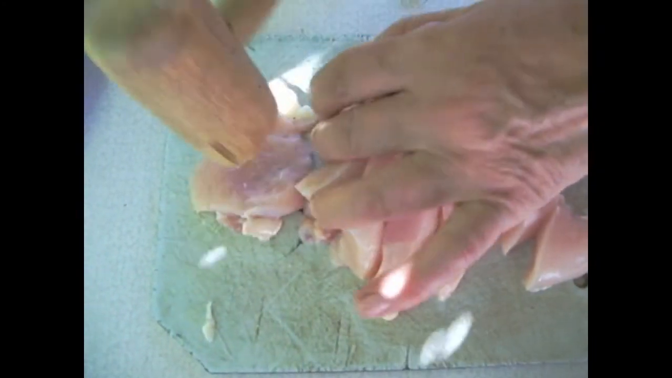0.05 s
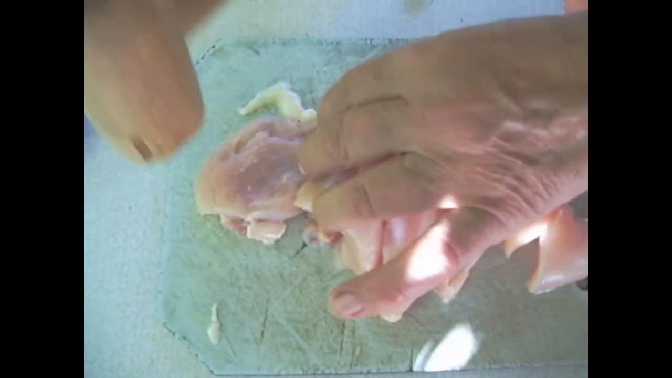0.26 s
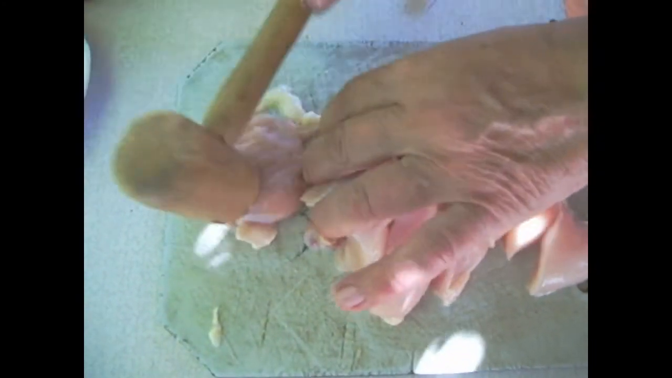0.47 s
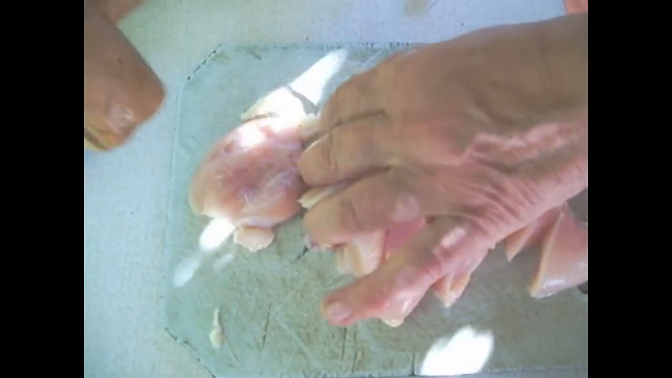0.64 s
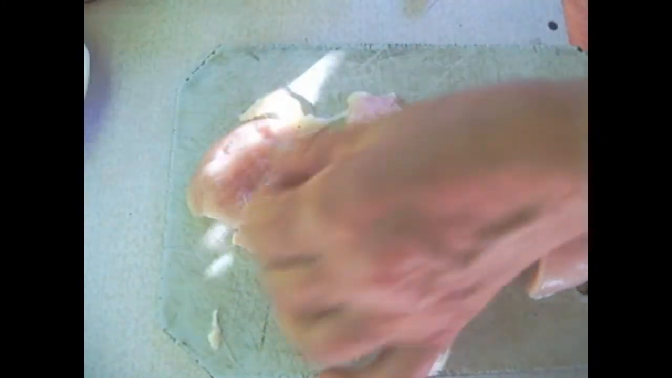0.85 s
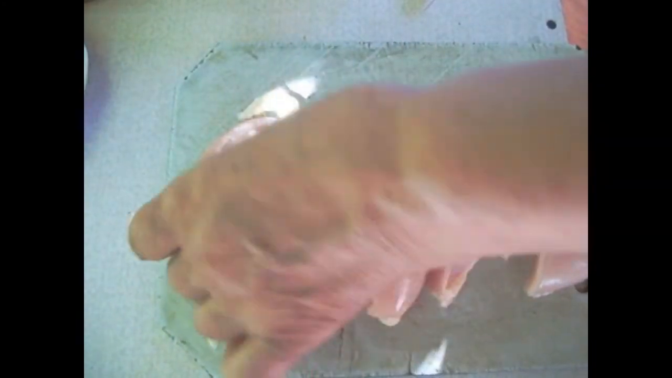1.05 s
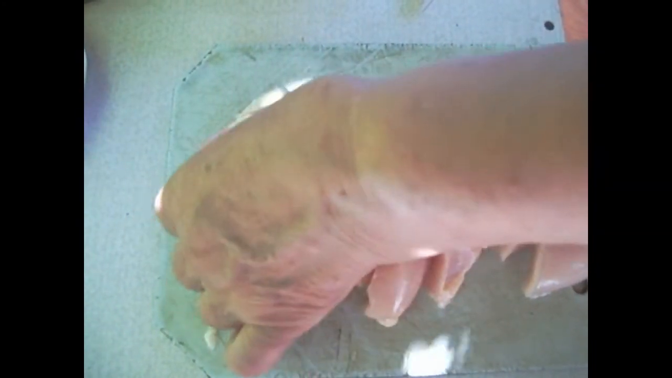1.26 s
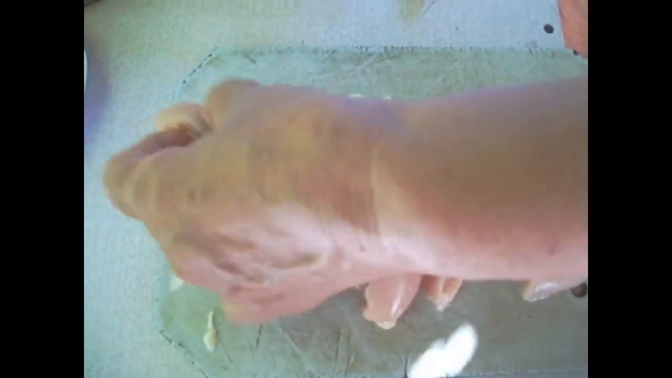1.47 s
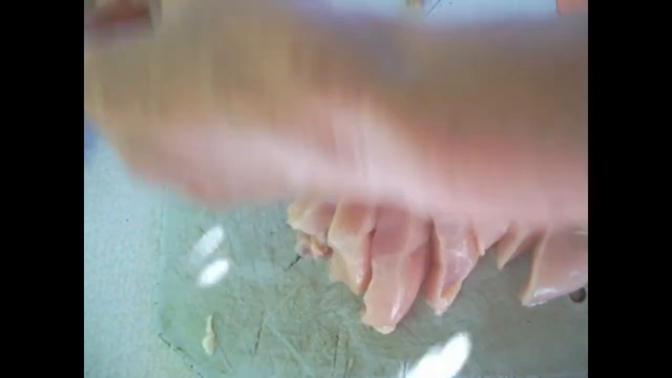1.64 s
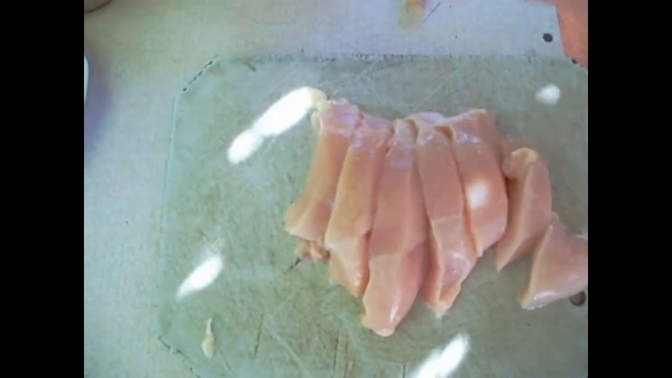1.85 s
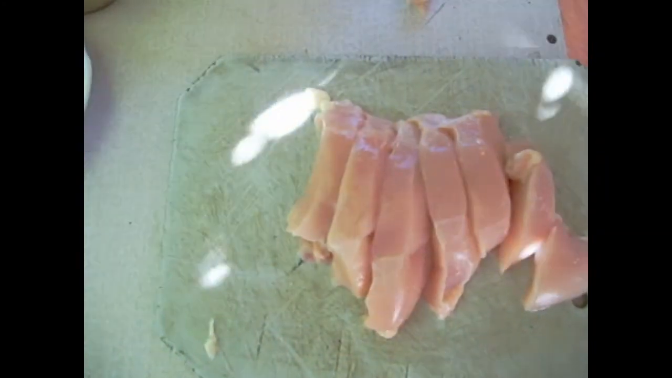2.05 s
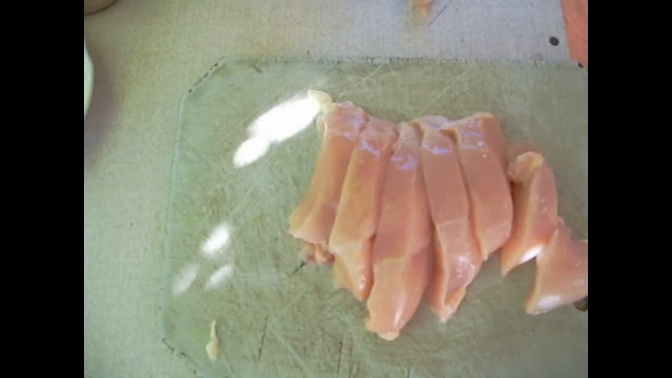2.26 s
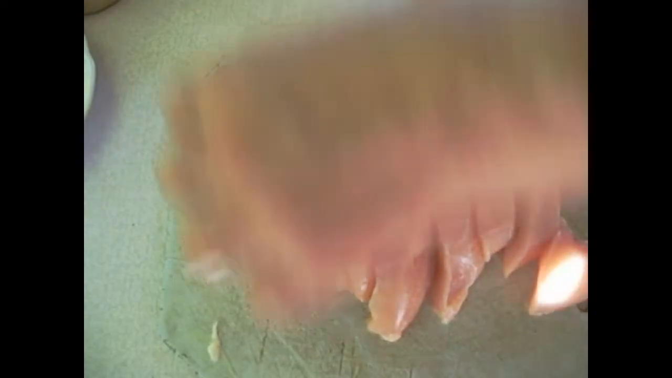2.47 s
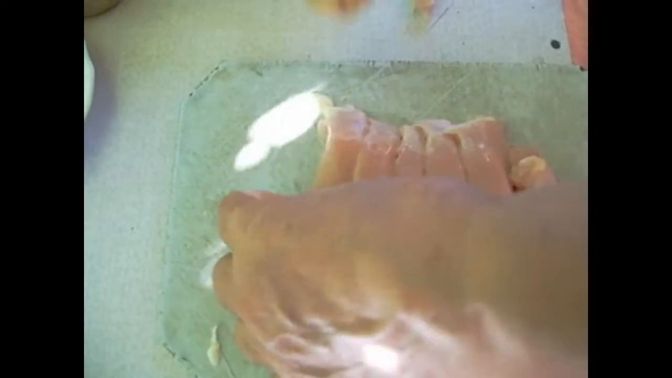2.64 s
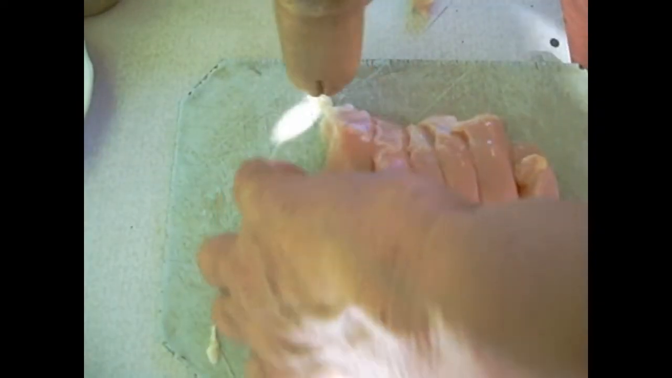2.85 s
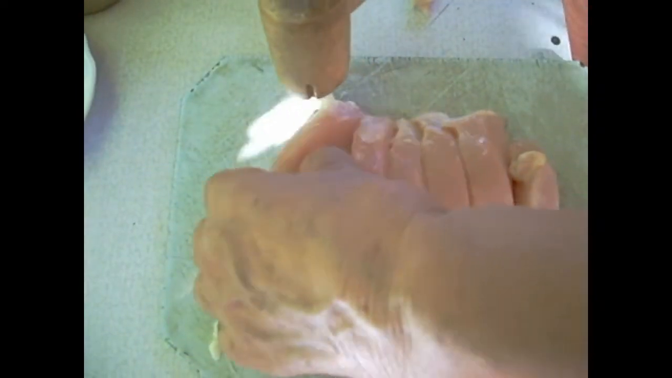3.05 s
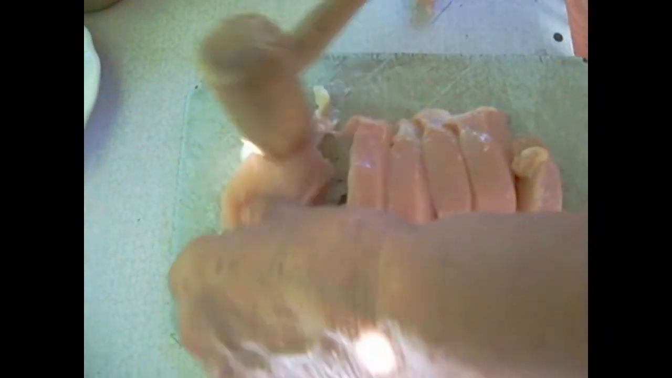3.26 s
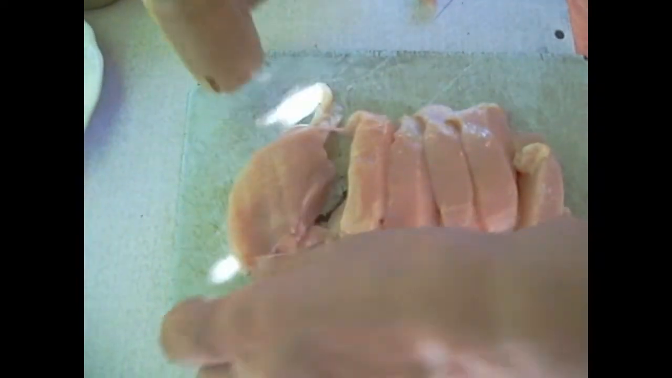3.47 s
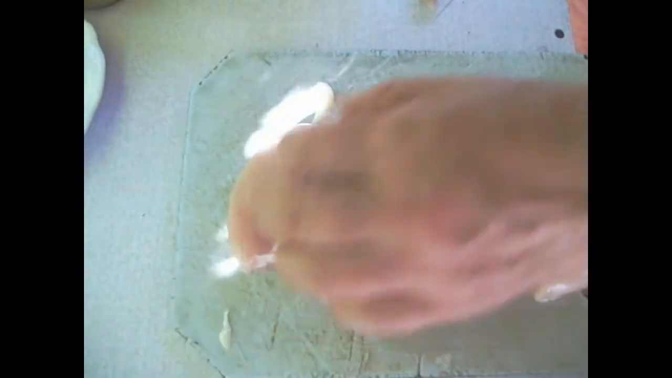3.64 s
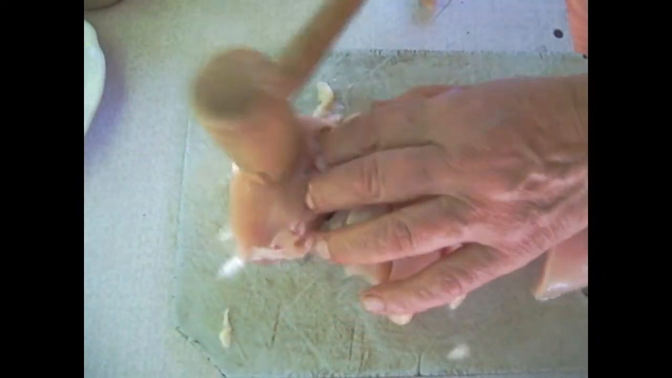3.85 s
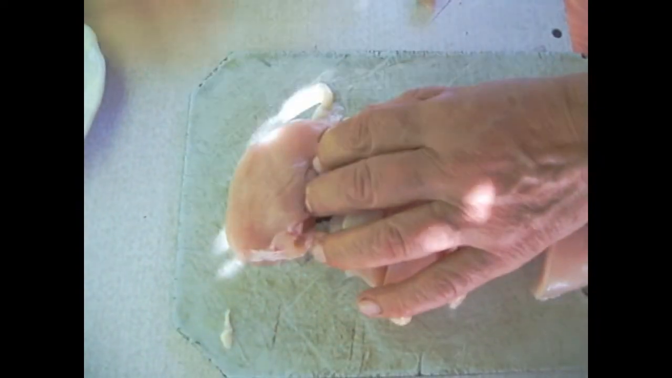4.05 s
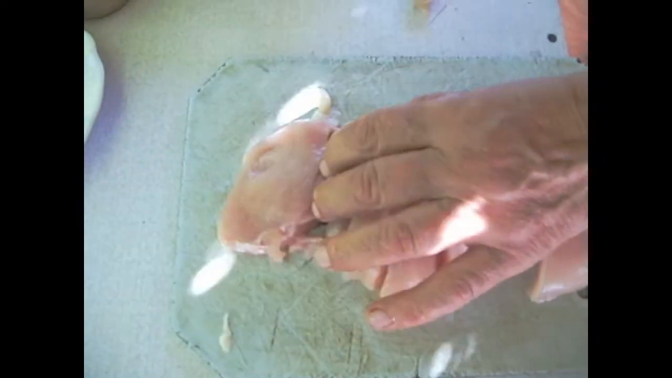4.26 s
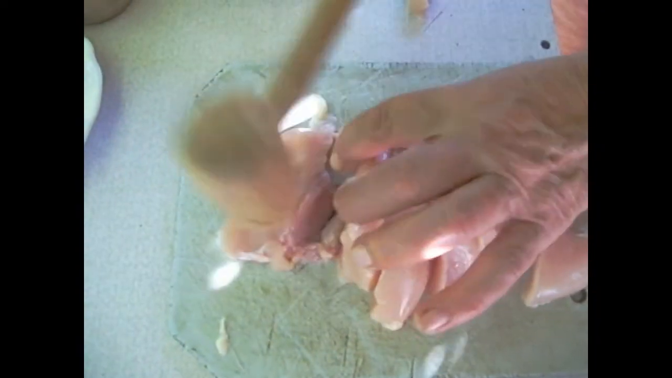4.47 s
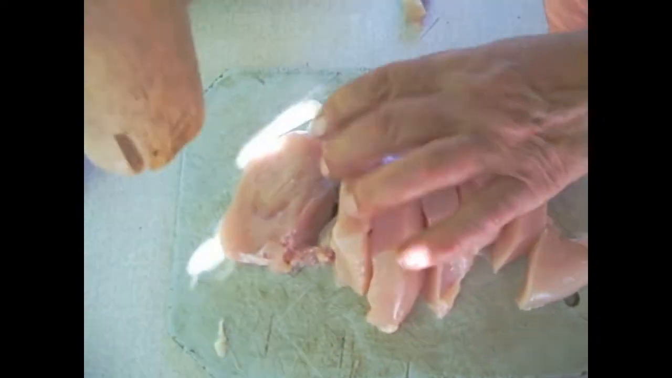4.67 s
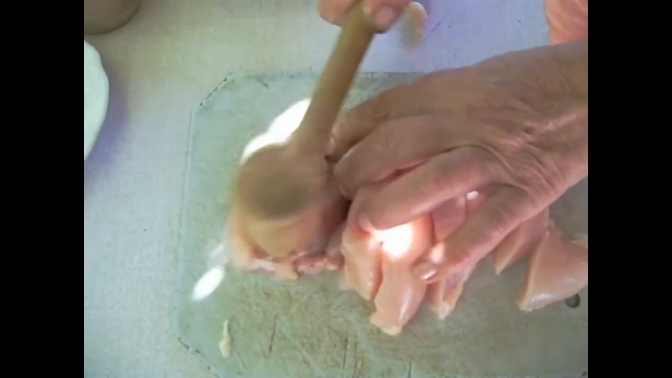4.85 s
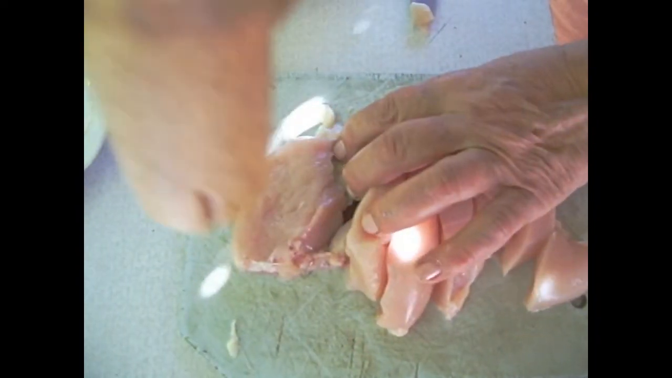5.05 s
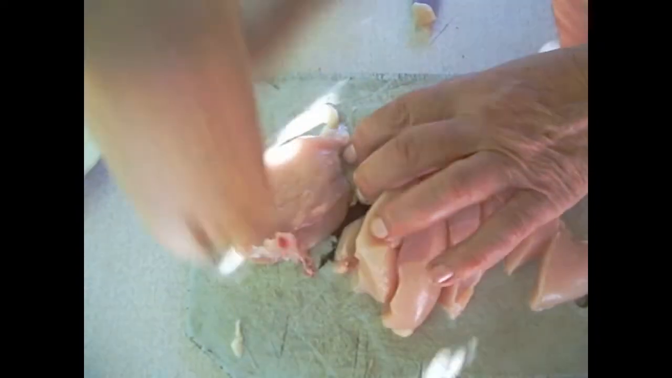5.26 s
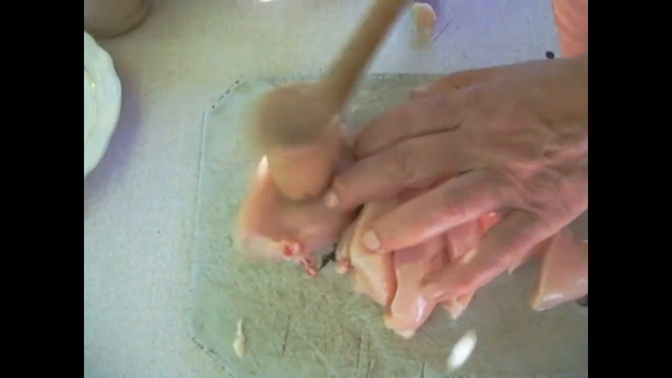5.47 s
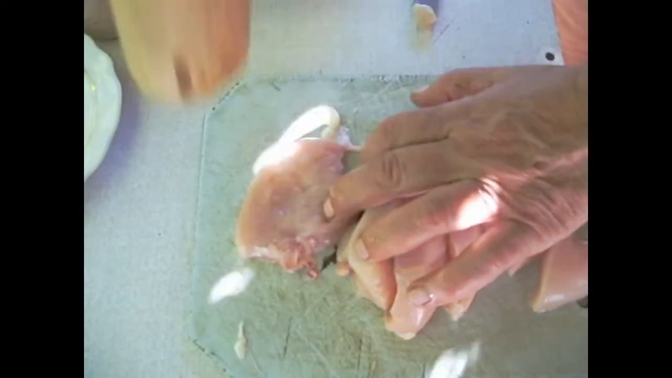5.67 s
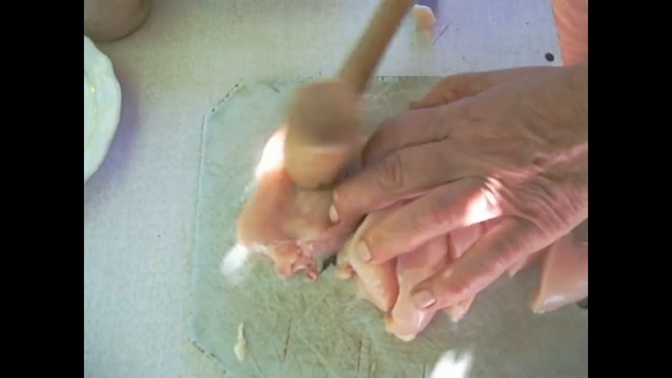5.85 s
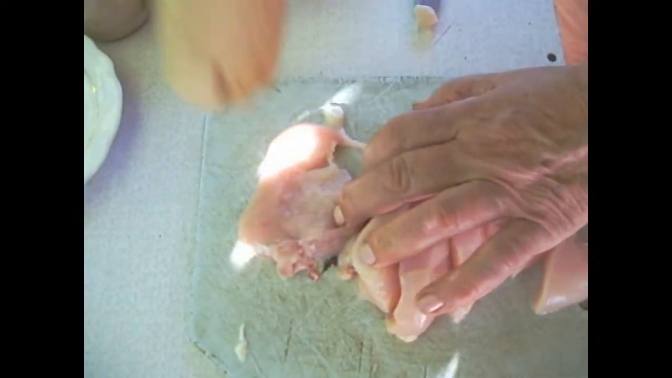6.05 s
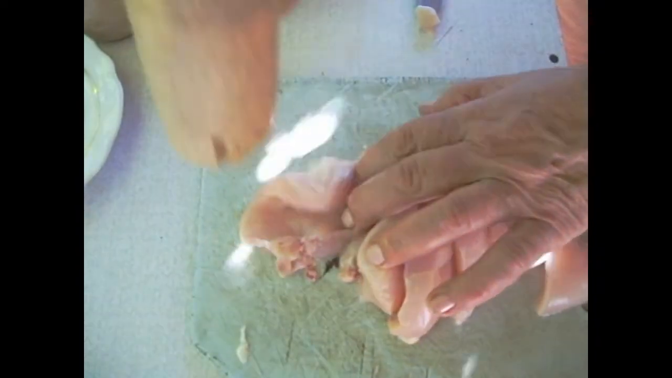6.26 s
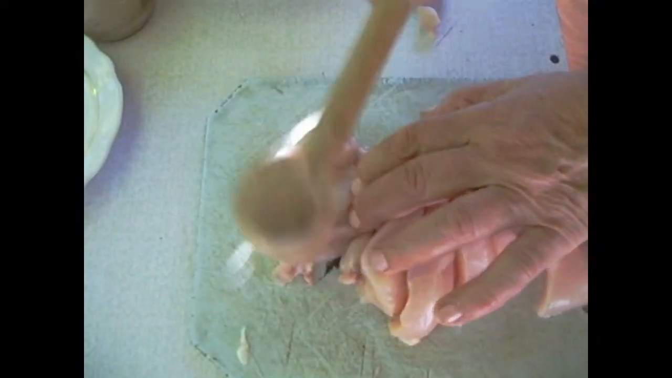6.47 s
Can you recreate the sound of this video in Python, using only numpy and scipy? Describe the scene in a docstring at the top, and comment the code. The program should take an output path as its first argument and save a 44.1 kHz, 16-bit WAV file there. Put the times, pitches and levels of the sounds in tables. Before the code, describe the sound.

Close in a small kitchen, a wooden mallet smacks raw meat on a cutting board once, rattling nearby dishes. A hissy pause follows, with faint finger taps, a sticky peel and soft bumps. After a lighter knock, loud wet blows come about three per second until the end, distorting a cheap microphone.

```python
"""Soft bumps over low rumble, hiss and thin whines come first; then a wooden mallet pounds raw meat on a board.
Each blow slaps wet meat (bright noise), knocks the board and shakes the worktop (ringing modes, rough thump),
and makes crockery chatter (noise and clinks). Between blows fingers tick, bump and peel the sticky meat.
It is a small kitchen, close to a cheap camera microphone: a faint noise tail, and an input that overloads."""
import sys
import numpy as np
from scipy import signal
from scipy.fft import rfft, irfft
from scipy.io import wavfile

SR = 44100
rng = np.random.default_rng(int(sys.argv[2]) if len(sys.argv) > 2 else 0)


def transcribe(u):
    """Save the signal u as a 16-bit wav file named by the first command-line argument.

    u: samples, shape (n,) or (channels, n), limited to [-1, 1]; the rate is SR.
    q: integer samples, one column per channel.
    """
    v = np.clip(np.atleast_2d(u).T, -1, 1)
    q = np.round(v * 32767).astype(np.int16)
    wavfile.write(sys.argv[1], SR, q)


N = 287085
T = np.arange(N) / SR


def from_db(db):
    """Decibels to gain."""
    return 10 ** (np.asarray(db) / 20)


def at_hz(points, hz):
    """Read a table of (Hz, value) on a log-frequency axis."""
    points = np.array(points)
    return np.interp(np.log(hz), np.log(points[:, 0]), points[:, 1])


def coloured(spectrum):
    """Steady noise shaped by a spectrum of (Hz, dB per Hz), rms 1."""
    hz = np.maximum(np.fft.rfftfreq(N, 1 / SR), 1)
    noise = irfft(rfft(rng.standard_normal(N)) * from_db(at_hz(spectrum, hz)), N)
    return noise / noise.std()


def stepped_gain(spread_db, step):
    """Random gain that holds each value for a number of samples."""
    values = rng.standard_normal(N // step + 1)
    return from_db(spread_db * np.repeat(values, step)[:N])


def burst(start_s, db, rise_s, t60_s):
    """Envelope that rises from start_s and dies away exponentially."""
    envelope, start = np.zeros(N), int(start_s * SR) + 1
    age = T[start:start + int(2 * t60_s * SR) + 2] - start_s
    rise = 1 - np.exp(-age / max(rise_s, 1e-5))
    envelope[start:start + len(age)] = from_db(db - 60 * age / max(t60_s, 1e-4)) * rise
    return envelope


def push(start_s, db, rise_s, t60_s):
    """Burst scaled by its energy: as a noise force, db sets the height of the ringing it starts."""
    shape = burst(start_s, 0, rise_s, t60_s)
    return from_db(db) * shape / np.sqrt(np.sum(shape ** 2))


def ring(force, hz, t60_s):
    """Resonant mode: a unit click sets a decaying sine of height 1 ringing."""
    radius, angle = from_db(-60 / (t60_s * SR)), 2 * np.pi * hz / SR
    feedback = [1, -2 * radius * np.cos(angle), radius * radius]
    return signal.lfilter([0, np.sin(angle)], feedback, force + 1e-18)   # tiny inaudible offset


# Mallet blows: start_s [s], slap_db [dB], board_db [dB], board_pitch_hz [Hz], push_t60_s [s],
# worktop_db [dB], rattle_db [dB], clink_db [dB]
BLOWS = [(0.3954, 3.5, 7, 1250, 0.12, -10, -5, -26.5), (3.3742, -16, 5, 970, 0.012, -20.5, -45, -62),
         (3.8303, -5.5, 9, 1134, 0.08, -14.5, -11, -30.5), (4.119, 8, 18.5, 1187, 0.044, -3, -5, -19.5),
         (4.411, 10.5, 16, 1200, 0.051, -6, -5.5, -25.5), (4.8418, 9, 11, 1196, 0.046, -8.5, -7, -27.5),
         (5.1561, 8, 12.5, 1240, 0.11, -6.5, -3.5, -19.5), (5.5041, 7, 10, 1106, 0.086, -13.5, -7, -27),
         (5.8230, 4.5, 11.5, 1224, 0.035, -9.5, -11.5, -26.5),
         (6.1279, 9.5, 8.5, 1234, 0.14, -6, -10.5, -20), (6.4255, 3, 5.5, 1090, 0.061, -20, -30, -49)]
# Further contacts just before or after a blow: start_s [s], slap_db [dB], board_db [dB]
OTHER_CONTACTS = [(0.3919, -14, -15.5), (3.833, 5.5, -17), (3.8750, 0.5, -23), (4.1411, -12, 3.5),
                  (4.891, -9.5, -19), (5.2240, -9.5, -15), (5.5080, -3, -18), (6.43, 5, -1),
                  (6.4536, -0.5, -10)]
# Light touches on the board: start_s [s], board_db [dB], treble_db [dB], board_pitch_hz [Hz]
TAPS = [(.518, -42, -30, 1200), (1.128, -34.5, -41, 1020), (1.15, -32.5, -39, 1030),
        (1.364, -35, -34.5, 1180), (1.8221, -30.5, -36, 1290), (2.29, -27, -51, 740),
        (3.054, -33, -53, 804), (3.138, -24, -30, 1100), (3.197, -35, -38, 1050), (3.2473, -21, -32, 1096),
        (4.33, -32, -54, 1030)]
# Spectrum of the wet slap: pitch_hz [Hz], density_db [dB per Hz]
SLAP = [(500, 17.5), (1500, 10), (3000, 16), (5000, 14.5), (7000, 2), (12000, 4), (16000, -20)]


def slaps():
    """Wet meat and wood meet in a short bright splash of noise; light touches are duller."""
    rise_s = 0.0003
    blows = sum(burst(blow[0], blow[1], rise_s, 0.092) for blow in BLOWS)
    other_contacts = sum(burst(start_s, slap_db, rise_s, 0.049) for start_s, slap_db, _ in OTHER_CONTACTS)
    taps = sum(burst(start_s, treble_db, rise_s, 0.059) for start_s, _, treble_db, _ in TAPS)
    bright = (blows + other_contacts) * coloured(SLAP)
    dull = taps * coloured([(1000, -32), (2500, 5.5), (4500, -0.5), (7000, -8), (16000, -16)])
    return bright + dull


# Modes of the cutting board: pitch_hz [Hz], level_db [dB], t60_s [s]
BOARD = [(824, -2.5, 0.062), (895, -2.5, 0.049), (951, 0.5, 0.044), (1008, -1.5, 0.034),
         (1067, -3.5, 0.044), (1119.5, 0.5, 0.049), (1178.4, -1.5, 0.038), (1257, 0, 0.043),
         (1309.6, -2, .05), (1389, -2.5, 0.049), (1545, -0.5, 0.042), (1735, -6, 0.05), (2046, -8, 0.046)]


def board():
    """The meat cushions the mallet, so a push lasts some milliseconds; the spot struck favours modes near one pitch."""
    pushes = [(push(blow[0], blow[2], 0.0011, blow[4]), blow[3]) for blow in BLOWS]
    pushes += [(push(start_s, board_db, 0.0003, 0.0081), 1150) for start_s, _, board_db in OTHER_CONTACTS]
    pushes += [(push(start_s, board_db, 0.00058, 0.03), hz) for start_s, board_db, _, hz in TAPS]
    forces = np.array([force for force, _ in pushes])
    favoured_hz = np.array([hz for _, hz in pushes])
    out = np.zeros(N)
    for hz, level_db, t60_s in BOARD:
        octaves_off = abs(np.log2(hz / favoured_hz))
        share = from_db(level_db - np.minimum(29.2 * octaves_off, 12))   # at most 12 dB weaker
        out += ring(share @ forces * rng.standard_normal(N), hz, t60_s)
    return out


# Modes of the worktop: pitch_hz [Hz], level_db [dB], t60_s [s]
WORKTOP = [(135.3, -12, 0.32), (152, -8.5, 0.13), (189.4, -7, 0.26), (246, -17, 0.11), (289, -2.5, 0.19),
           (318.5, -5, 0.16), (392.6, -5.5, 0.19), (438, -6.5, 0.1), (580, -12, 0.098), (630, -8, 0.048),
           (693, -2, 0.15), (798.4, -2.5, .15)]
THUMP_DB = 1.8   # rough thump against the worktop modes


def worktop():
    """Each blow strikes the worktop modes with its own strengths and signs, over a dull rough thump."""
    blows = np.array(BLOWS)
    at, blow_db = (blows[:, 0] * SR).astype(int), blows[:, 5]
    shape = (len(BLOWS), len(WORKTOP))
    spread_db = 2.5 * rng.standard_normal(shape)
    signs = rng.choice([-1, 1], shape)
    modes = np.zeros(N)
    for k, (hz, level_db, t60_s) in enumerate(WORKTOP):
        strikes = np.zeros(N)
        strikes[at] = signs[:, k] * from_db(blow_db + level_db + spread_db[:, k])
        modes += ring(strikes, hz, t60_s)
    thump = from_db(THUMP_DB) * coloured([(30, -34), (110, -19), (200, -1), (450, 0), (900, -2),
                                          (1500, -9), (2500, -22), (4000, -37)])
    return modes + thump * sum(burst(blow[0], blow[5], 0.0054, 0.17) for blow in BLOWS)


# Dishes start to hop soon after a blow, and hop longer the harder the worktop shakes
HOP_DELAY_S, HOP_LENGTH_S, HOP_S_PER_DB = 0.011, 0.091, 0.004   # length is at worktop_db = 0


def hopping(settle_s):
    """For each blow, how hard the dishes hop: it builds up, wanes and then settles."""
    hops = []
    for blow in BLOWS:
        start_s = blow[0] + HOP_DELAY_S
        end_s = start_s + HOP_LENGTH_S + HOP_S_PER_DB * blow[5]
        settling = 1 + np.exp(np.clip((T - end_s) / settle_s, -50, 50))
        hops.append(burst(start_s, 0, 0.0062, 0.29) / settling)
    return np.array(hops)


# Modes of the dishes: pitch_hz [Hz], level_db [dB], t60_s [s]
CROCKERY = [(2520, -9, .14), (2713, -14, .1), (3555, -9, .07), (3980, -7, .1), (4178, -4, .09),
            (5656, -4, .08), (6203, -6, .11), (7133, -8, .07), (7710, 2, .065), (7827, -7, .06),
            (8985, -7, .075), (9568, -7, .075), (9946, -6, .09), (11050, -16, .07), (11890, -9, .06),
            (12090, -11, .06), (12335, -8, .075), (12630, -14, .07), (13740, -14, .06), (14630, -11, .06),
            (14920, -11, .06), (15470, -12, .065)]


def crockery():
    """Dishes hop on the shaking worktop: a rattle of noise and uneven clinks; each blow favours other modes."""
    rattle_db, clink_db = np.array(BLOWS)[:, 6:].T
    clinks = rng.random(N) < 1500 / SR   # 1500 contacts per second on average
    clinks = clinks * from_db(4.2 * np.minimum(rng.exponential(1, N), 3))
    favour_db = 1.5 * rng.standard_normal((len(BLOWS), len(CROCKERY)))
    hops = hopping(settle_s=0.0017)
    rings = np.zeros(N)
    for k, (hz, level_db, t60_s) in enumerate(CROCKERY):
        strength = from_db(level_db + clink_db + favour_db[:, k]) @ hops
        rings += ring(strength * clinks * rng.standard_normal(N), hz, t60_s)
    rattle = coloured([(800, -13), (2500, 13), (5000, 11.0), (9000, 2.5), (16000, -7)])
    rattle *= stepped_gain(3, 88)   # contacts come in uneven 2 ms spurts
    return rings + from_db(rattle_db) @ hopping(settle_s=0.0095) * rattle


# Sticky meat lets go with a tick: start_s [s], peak_db [dB], pitch_hz [Hz]
TICKS = [(.5535, -33, 8800), (2.240, -27, 4270), (2.247, -25, 9500), (2.2463, -24.5, 2600),
         (2.250, -18, 4230), (2.258, -26, 2160), (2.266, -23, 3400), (2.268, -25, 4350),
         (2.759, -28, 10800), (3.145, -25, 2740), (3.2474, -24, 2710), (3.691, -33, 3330),
         (5.589, -19, 13500), (5.946, -31, 12000), (5.967, -28, 9800), (6.4955, -25, 13600)]
FAINT_TICKS_PER_S, FAINT_TICK_DB = 2.5, -33   # scattered at random
FAINT_TICK_LOW_HZ, FAINT_TICK_HIGH_HZ = 9000, 14000


def ticks():
    """Sticky meat letting go: short noise bursts ring a briefly sounding resonance."""
    out = np.zeros(N)
    span_hz = FAINT_TICK_HIGH_HZ - FAINT_TICK_LOW_HZ
    draws = rng.random((int(FAINT_TICKS_PER_S * T[-1]), 2))
    faint = [(T[-1] * when, FAINT_TICK_DB, FAINT_TICK_LOW_HZ + span_hz * pitch) for when, pitch in draws]
    length = SR // 20
    for start_s, peak_db, hz in TICKS + faint:
        start = int(start_s * SR)
        near = slice(start, start + length)
        force = burst(start_s, 0, 0.00019, 0.026)[near] * rng.standard_normal(length)[:N - start]
        tick = ring(force, hz, 24 / hz)
        out[near] += from_db(peak_db) * tick / abs(tick).max()
    return out


# Soft bumps through the worktop: start_s [s], level_db [dB], pitch_hz [Hz]
BUMPS = [(0.055, -22.5, 150), (0.084, -21, 198), (.11, -22, 120), (2.283, -20, 450), (2.296, -10, 353),
         (2.307, -18, 450), (2.431, -20.5, 80), (2.956, -14, 141), (3.255, -12.5, 335), (5.784, -16, 132)]


def bumps():
    """Soft knocks: low sines that die within a few cycles."""
    out = np.zeros(N)
    for start_s, level_db, hz in BUMPS:
        out -= burst(start_s, level_db, 0.0016, 2.8 / hz) * np.sin(2 * np.pi * hz * (T - start_s))
    return out


PEEL_S, PEEL_DB, PEEL_RISE_S, PEEL_T60_S = 2.238, -31.5, 0.007, 0.32


def peel():
    """A strip is pulled off the board: a burst of noise whose level jumps as it lets go in jerks."""
    grains = stepped_gain(2.5, 64)
    crackle = coloured([(200, -10), (400, -7), (1200, -12), (2500, -11), (4300, -16), (5500, -20), (15000, -20)])
    return burst(PEEL_S, PEEL_DB, PEEL_RISE_S, PEEL_T60_S) * grains * crackle


# Level of the low rumble: time_s [s], level_db [dB rms]
RUMBLE = [(0.0, -42), (0.3, -46), (0.55, -42), (0.9, -48), (1.34, -44.5), (1.9, -50.5), (2.4, -48),
          (3.2, -45), (3.6, -49), (4.3, -44), (4.8, -50), (5.4, -42), (5.9, -44), (6.5, -45)]


def rumble():
    """Low noise that swells and sinks."""
    time_s, level_db = np.transpose(RUMBLE)
    noise = coloured([(15, -3), (40, 8.5), (130, -7.5), (220, -5.0), (400, -23.5)])
    return from_db(np.interp(T, time_s, level_db)) * noise


# Decay of the kitchen: pitch_hz [Hz], t60_s [s]
ROOM = [(100, 0.27), (400, 0.32), (1300, 0.21), (3000, 0.2), (8000, 0.17), (16000, 0.051)]
ROOM_DB = -41   # gain of the tail


def room(near):
    """Diffuse tail: octave bands of noise, each dying at its own rate."""
    age, tail = T[:SR // 2], 0
    for low_hz in 60 * 2. ** np.arange(8):
        octave = signal.butter(2, [low_hz, 2 * low_hz], "band", fs=SR, output="sos")
        band = signal.sosfilt(octave, rng.standard_normal(len(age)))
        tail = tail + band * from_db(-60 * age / at_hz(ROOM, low_hz * np.sqrt(2)))
    tail = tail * (age > 0.003)   # the tail starts after 3 ms
    return from_db(ROOM_DB) * signal.fftconvolve(near, tail)[:N]


# Spectrum of the hiss: pitch_hz [Hz], density_db [dB per Hz]
HISS = [(35, -30), (60, -24), (300, -6.5), (560, -5), (1360, -2.5), (1830, -9.5), (4550, -9), (6200, -18),
        (9000, -18.5), (13600, -25), (15600, -29)]
HISS_DB = -41   # rms
# Steady electronic whines: pitch_hz [Hz], level_db [dB rms]
WHINES = [(457.6, -61), (6589, -60), (7989, -49.5), (13184, -53.5)]
CLICK_S, CLICK_DB = 3.28519, -3.5


def microphone_floor():
    """Hiss and steady whines of the camera electronics, and one bare click two samples wide."""
    out = from_db(HISS_DB) * coloured(HISS)
    for hz, level_db in WHINES:
        out += np.sqrt(2) * from_db(level_db) * np.sin(2 * np.pi * hz * T)
    click = int(CLICK_S * SR)
    out[click:click + 2] += from_db(CLICK_DB)
    return out


def scene():
    """All sources, the room and the microphone floor, in one channel."""
    near = slaps() + board() + worktop() + crockery() + ticks() + bumps() + peel() + rumble()
    return (near + room(near) + microphone_floor())[None]


CLIP_LEVEL, COUPLING_HZ, CUTOFF_HZ = 0.69, 53.7, 15800


def record(dry):
    """The input clips hard, a coupling capacitor thins the bass, then the top is cut."""
    clipped = np.clip(dry, -CLIP_LEVEL, CLIP_LEVEL)
    coupled = signal.lfilter(*signal.butter(1, COUPLING_HZ, "high", fs=SR), clipped)
    steep = signal.firwin(401, CUTOFF_HZ, window=("kaiser", 10), fs=SR)
    return signal.fftconvolve(coupled, steep[None], "same")


dry = scene()
out = record(dry)
transcribe(out)
```